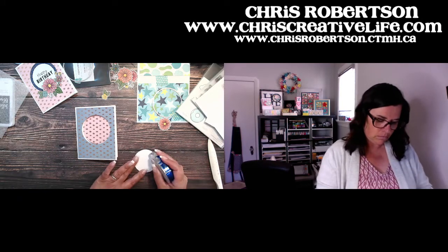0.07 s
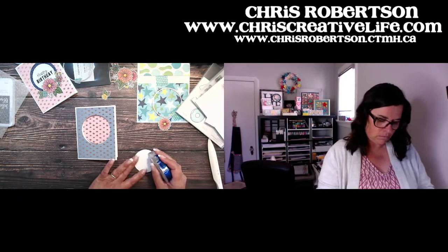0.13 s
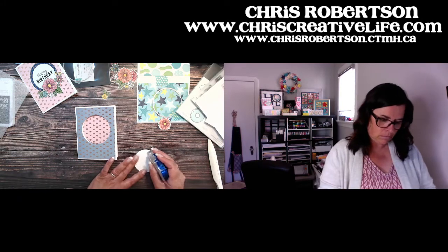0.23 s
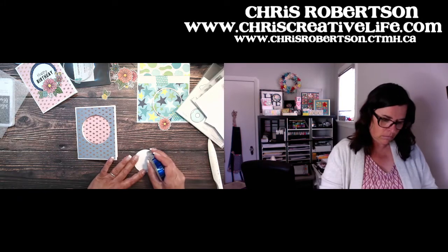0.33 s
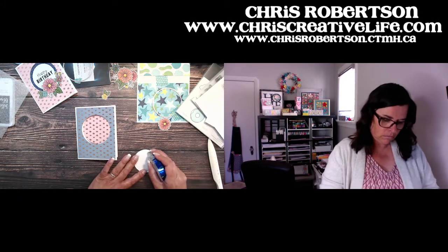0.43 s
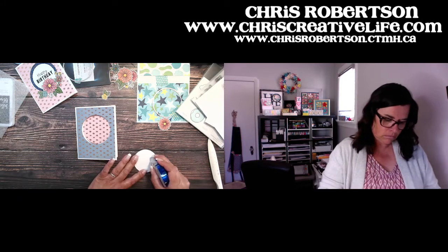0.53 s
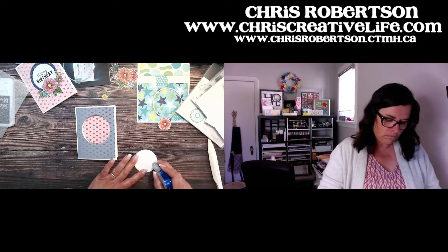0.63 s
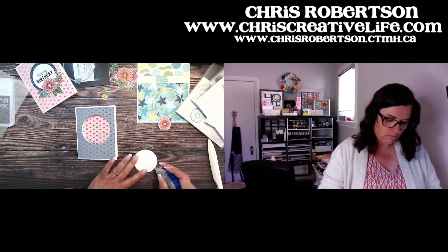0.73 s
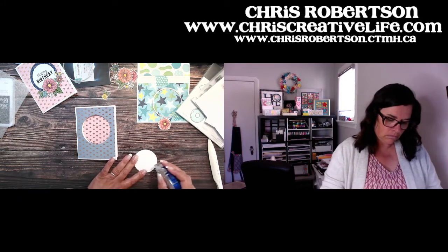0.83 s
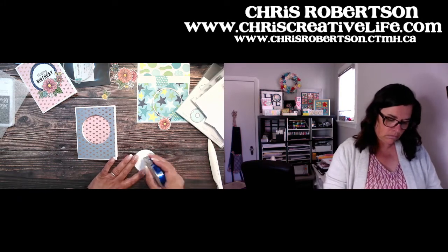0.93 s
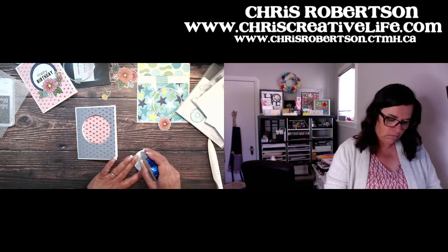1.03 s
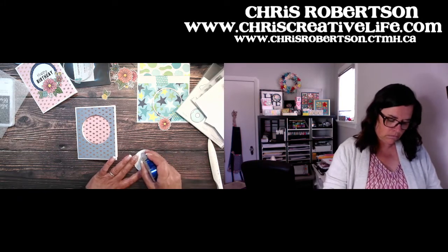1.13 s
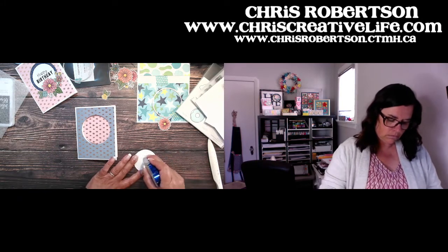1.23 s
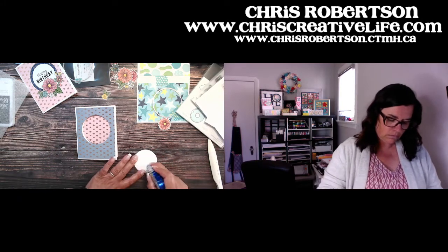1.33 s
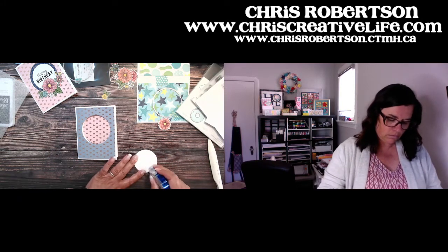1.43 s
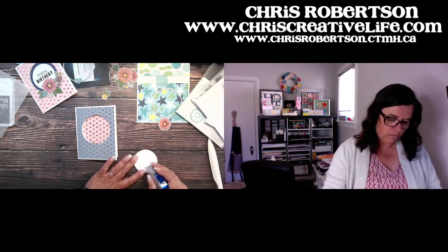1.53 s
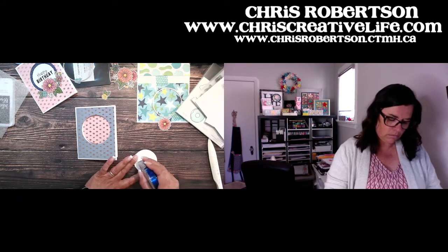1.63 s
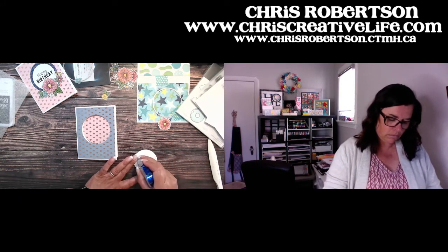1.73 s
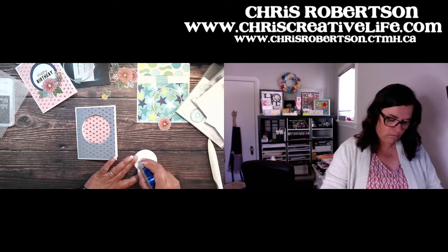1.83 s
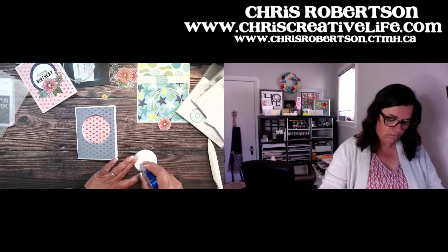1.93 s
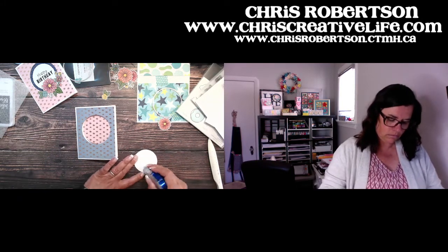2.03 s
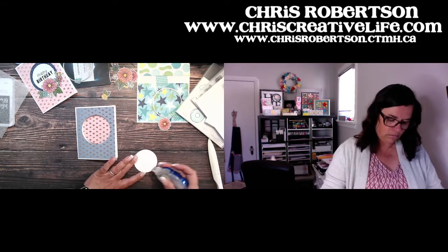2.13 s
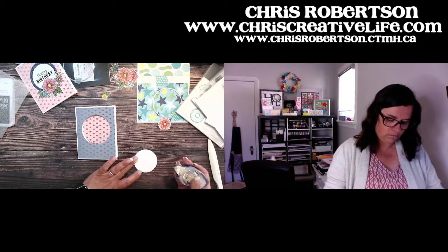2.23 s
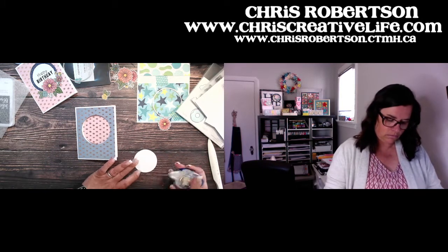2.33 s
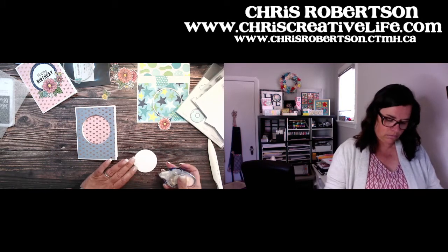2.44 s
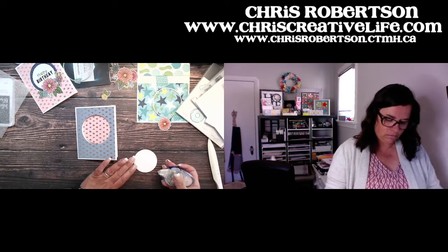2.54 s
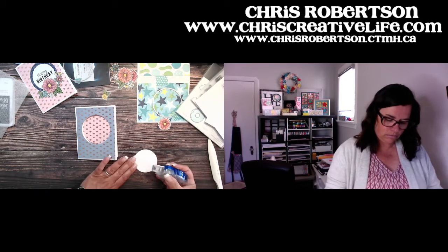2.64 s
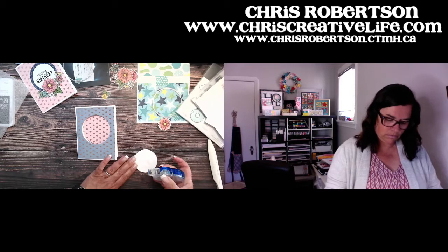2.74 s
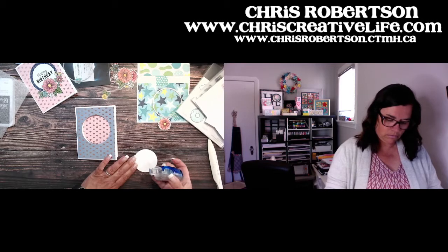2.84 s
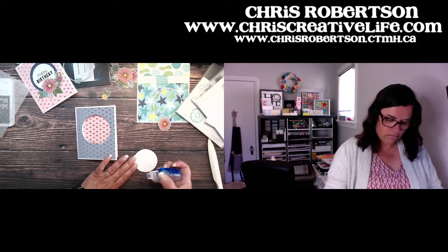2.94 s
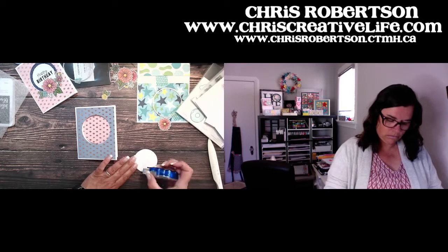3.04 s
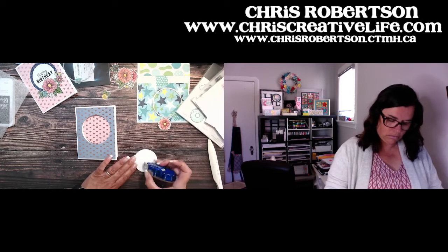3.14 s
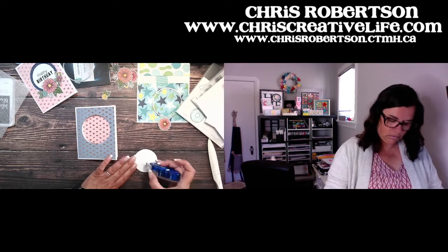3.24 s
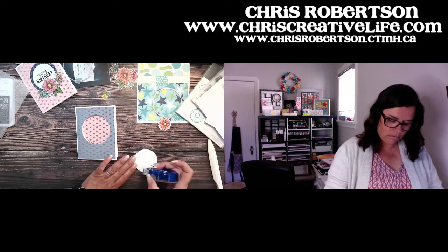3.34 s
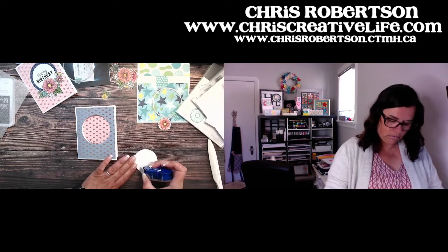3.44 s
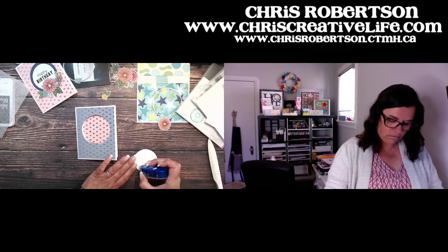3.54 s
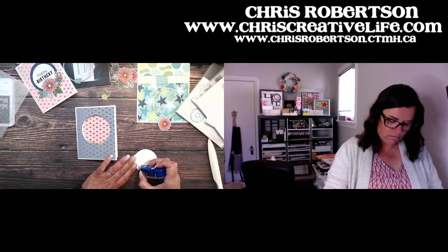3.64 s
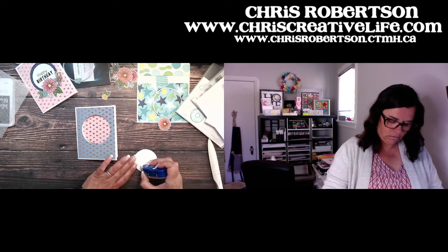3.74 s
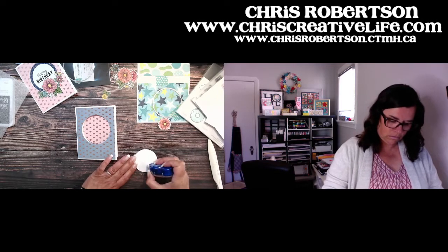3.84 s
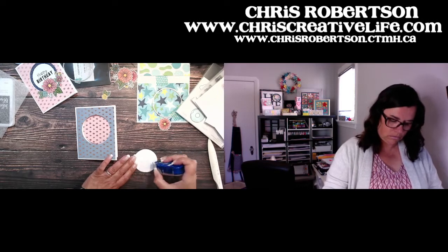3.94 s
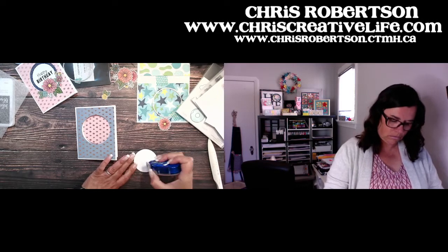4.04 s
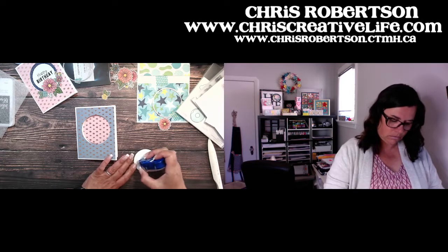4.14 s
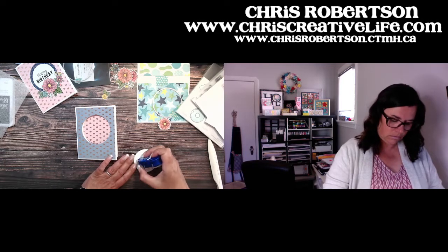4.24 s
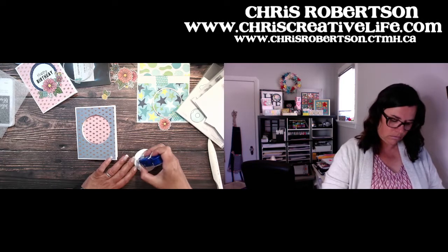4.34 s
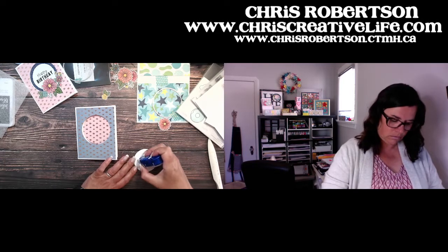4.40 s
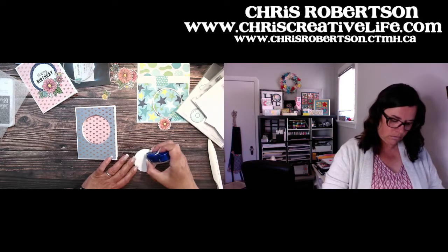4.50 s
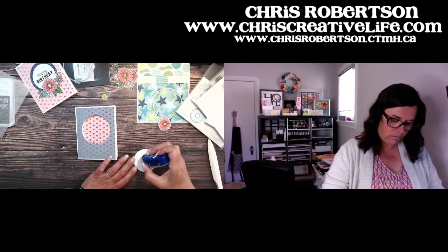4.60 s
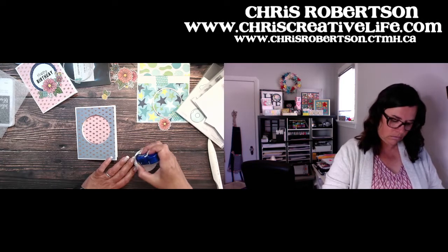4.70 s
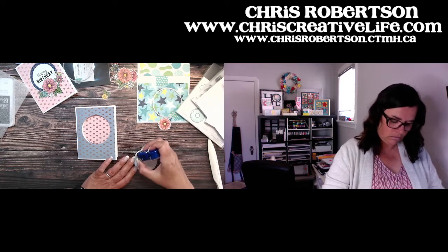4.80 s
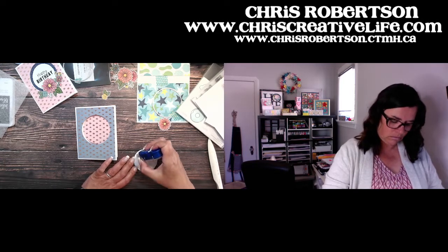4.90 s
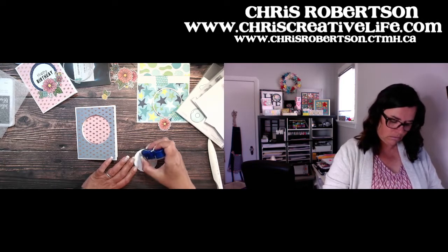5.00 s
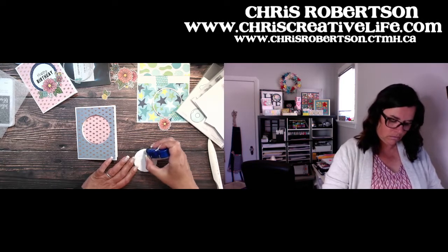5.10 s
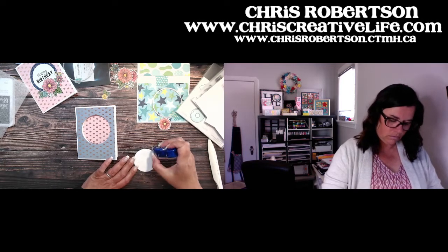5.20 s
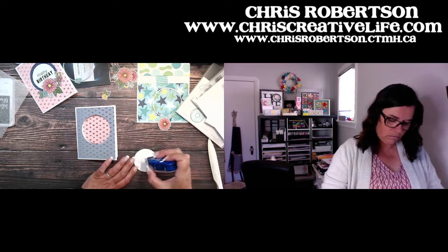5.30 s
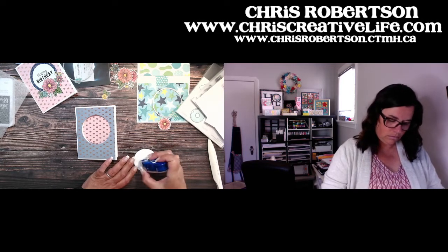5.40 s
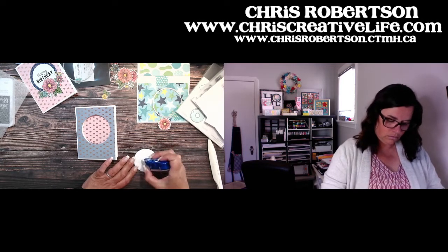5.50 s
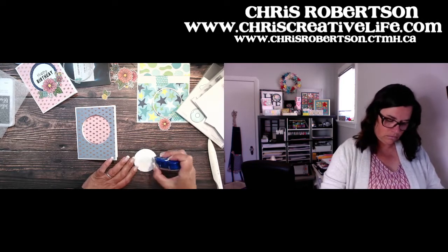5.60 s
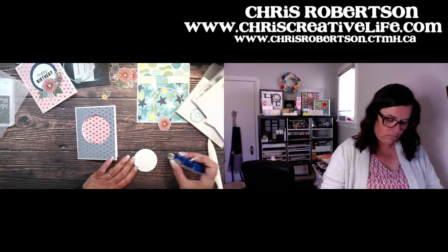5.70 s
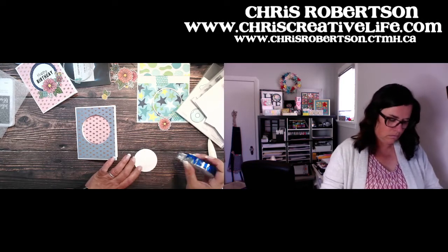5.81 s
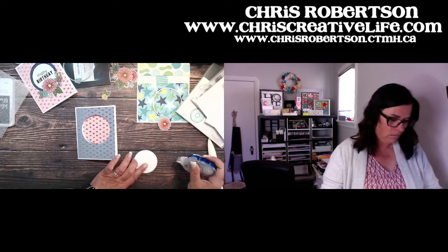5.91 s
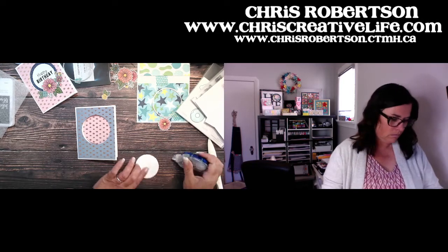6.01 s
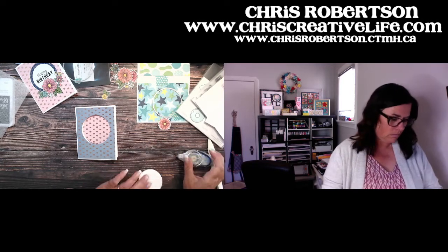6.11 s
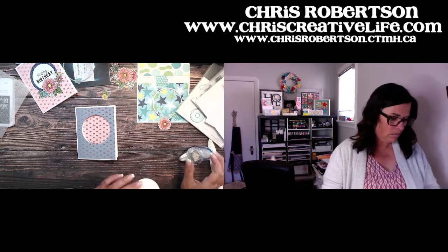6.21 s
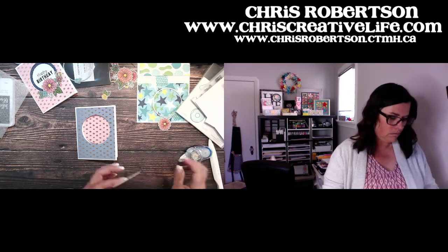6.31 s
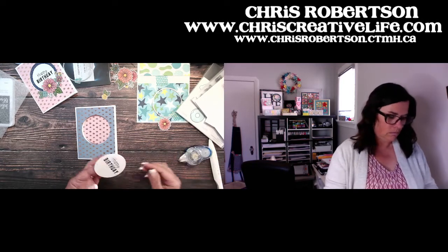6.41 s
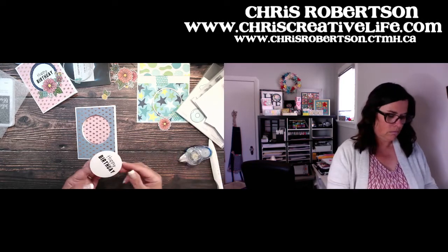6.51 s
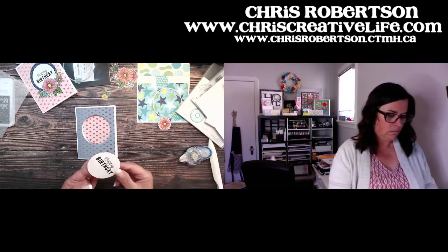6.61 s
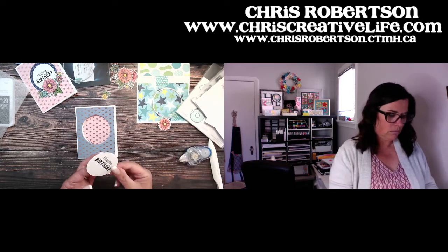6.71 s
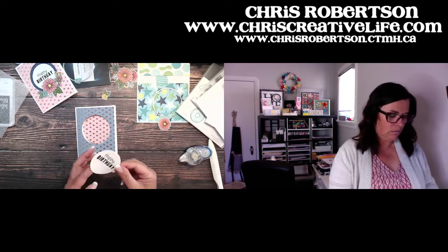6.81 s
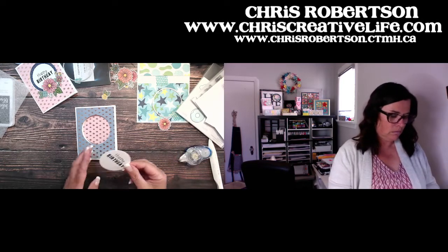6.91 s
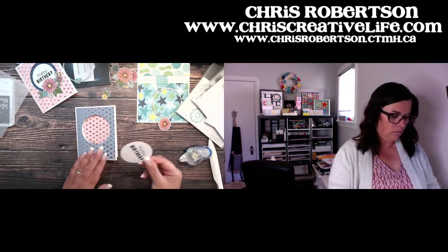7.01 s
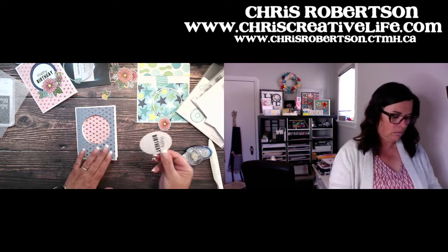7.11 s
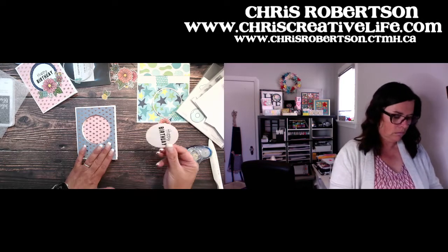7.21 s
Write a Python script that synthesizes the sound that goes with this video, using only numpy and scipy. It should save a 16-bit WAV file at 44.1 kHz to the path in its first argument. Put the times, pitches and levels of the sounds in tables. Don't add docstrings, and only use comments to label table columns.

```python
import sys
import numpy as np
from scipy import signal
from scipy.fft import rfft, irfft, next_fast_len
from scipy.io import wavfile
from scipy.ndimage import uniform_filter1d, map_coordinates

SR = 44100
rng = np.random.default_rng(int(sys.argv[2]) if len(sys.argv) > 2 else 0)


def ratio(d):
    e = np.asarray(d, float) / 20
    return 10 ** e


def master_out(mix):
    frames = np.transpose(np.atleast_2d(mix))
    ceiling = np.clip(frames, -1, 1)
    pcm = np.round(ceiling * 32767).astype(np.int16)
    wavfile.write(sys.argv[1], SR, pcm)


N = 319748

# pitch in Hz, level in dB per Hz.
HISS = [(50, -39), (85, -5), (161, -12.5), (201, -15), (381, -19.5), (507, -29), (690, -28), (788, -26.5),
        (879, -29.5), (1280, -32.5), (13800, -45.5), (16500, -49.5)]
MAINS_HZ = 60
# time in seconds, level in dB.
SWAY = [(0, -58.5), (.75, -28), (.91, -46), (1.11, -39.5), (1.47, -28.5), (1.86, -38), (2.06, -29),
        (2.95, -53), (3.76, -48), (3.84, -31.5), (4.26, -46.5), (4.68, -31.5), (4.81, -39), (5.37, -37),
        (5.53, -50.5), (5.67, -39.5), (7.25, -55)]
SHUDDER_DB, SHUDDER_GROWS, SHUDDER_REST_DB = -38, 0.33, -64
SHUDDER_RISE_S, SHUDDER_T60_S = 0.053, 0.39
HUM_DB = [1, 0.5, -1, -7.5, 2.5, 7, -3.5]

# pitch in Hz, width in Hz, level in dB.
CASE = [(3316, 545, -0.5), (4030, 1500, -3), (5230, 1320, -3), (6420, 830, -4), (7910, 1890, -4.5),
        (10190, 1900, -9), (11700, 1600, -11.5), (14400, 1400, -14)]
# pitch in Hz, width in Hz, level in dB.
HOLLOW = [(1110, 270, -3), (1400, 224, 2), (1599, 214, 1.5), (2150, 880, -7.5)]
# pitch in Hz, width in Hz, level in dB.
TABLE = [(408, 114, 2), (683, 220, -2), (802, 130, -2.5), (1011, 45, -7)]
# pitch in Hz, width in Hz, level in dB.
LEGS = [(139.8, 54, 0.5), (190, 135, 3), (281, 149, 2)]
# time in seconds, peak in dB, hollow part in dB, top part in dB.
TICKS = [(0.126, -52.5, -15, -10), (0.138, -48, -26, -13), (0.297, -45, -8.5, -5.5),
         (0.3148, -46, -5.5, -21), (0.3396, -38, -19, -17), (0.368, -35, -14.5, -5.5),
         (0.3888, -38.5, -20, -6.5), (0.847, -36.5, -10, -5.5), (0.8794, -58, -23, 3),
         (1.51, -41, -6.5, -11), (1.6084, -45.5, -16, 0), (1.9115, -37, -20, -7.5), (1.9353, -41, -14, -11),
         (1.948, -45, -17, -3.5), (2.191, -45, -22, -6), (4.91, -42, -21, -3), (4.817, -40, -25, -8),
         (2.1778, -42.5, -7, 3.5), (2.2197, -44, -22, -8.5), (2.231, -52, -5, -25), (3.614, -48, -4.5, -13),
         (3.652, -56, -15, -24), (3.67, -34.5, -15, -17), (4.228, -50, -8, -29), (4.3073, -31, -34, -15),
         (4.672, -50, -31, -3), (5.33, -42, -18, 3.5), (5.348, -50, -10, 1.5), (5.425, -61, -24, -4),
         (5.686, -36.5, -1.5, -25), (5.747, -46, -1, -19), (5.9739, -30.5, -24, -7), (6.129, -43, -21, -5),
         (6.135, -39, -25, -6), (6.334, -41.5, 4, -12)]
TICK_THUD_DB = -23.5

# time in seconds, ratchet teeth passed so far.
ROLLED = [
    [(.458, 0), (.4796, 1), (.5406, 5), (.5852, 9), (.684, 18), (.7235, 21), (.7556, 23), (.7952, 25)],
    [(1.113, 0), (1.2103, 3), (1.255, 6), (1.309, 12), (1.3921, 22), (1.4106, 24), (1.487, 30)],
    [(1.8066, 0), (1.8421, 1), (1.8992, 3), (1.9258, 4), (1.9567, 5), (1.9803, 6), (2.0158, 8),
     (2.1021, 16), (2.1495, 17)],
    [(3.683, 0), (3.7206, 1), (3.7792, 3), (3.8052, 4), (3.8249, 5), (3.8533, 8), (3.8965, 12),
     (3.9226, 14), (3.9458, 15)],
    [(4.287, 0), (4.387, 2), (4.4359, 4), (4.4804, 7), (4.5197, 11), (4.5427, 13), (4.5714, 14)],
    [(4.8458, 0), (4.9026, 1), (4.9373, 2), (4.9576, 3), (5.0187, 7), (5.0448, 9), (5.149, 17), (5.196, 23),
     (5.2459, 27)],
    [(5.5175, 0), (5.5571, 3), (5.6026, 7), (5.632, 10), (5.667, 14), (5.6945, 16)],
]
# time in seconds, level in dB.
EFFORT = [
    [(.3, -84.5), (.44, -60), (.5, -47.5), (.56, -45.5), (.7, -41.5), (.76, -47), (.82, -54), (.9, -85)],
    [(1.08, -52), (1.19, -57), (1.23, -44), (1.3, -42), (1.37, -41), (1.49, -50.5), (1.53, -55.5),
     (1.6, -57)],
    [(1.78, -55), (1.88, -56), (1.95, -49.5), (2.02, -42.5), (2.08, -44), (2.13, -57), (2.3, -59)],
    [(3.62, -67), (3.7, -55.5), (3.79, -52), (3.84, -42.5), (3.9, -42.5), (3.94, -57), (4.02, -57.5)],
    [(4.22, -58.5), (4.36, -53.5), (4.44, -62), (4.49, -37.5), (4.54, -40), (4.58, -56.5), (4.68, -58.5)],
    [(4.82, -45.5), (4.92, -93), (5.02, -47.5), (5.1, -44), (5.17, -39.5), (5.23, -39), (5.27, -62),
     (5.4, -57.5)],
    [(5.52, -49), (5.58, -45.5), (5.66, -35.5), (5.71, -51), (5.76, -54), (5.82, -58.5), (5.95, -59)],
]
# least level of the first teeth in dB, case drone in dB,
# pawl sings from in seconds, until in seconds, its ring in dB.
GRIP = [(-37, -26, 0.87, 0.42, -55), (-37.5, -11.5, 1.38, 1.3, -44), (-40, -33, 1.84, 1.5, -46.5),
        (-31.5, -7, 3.775, 3.84, -31.5), (-36.5, -6.5, 4.49, 4.53, -36), (-35.5, -7, 5.162, 5.185, -34),
        (-31.5, -5, 4.9, 6.6, -37.5)]
PRESS_DB = [3.5, 2.5, 2.5, -1, -2, 0.5, -3.5]
# time in seconds, change in dB.
CATCHES = [(.458, 10.5), (.4796, 7), (.495, 4), (1.113, 0.5), (1.145, 5.5), (1.178, 0.5), (1.21, 2.5),
           (1.8066, 4), (1.8421, 4), (1.871, 4), (1.8992, 8), (1.9258, 7.5), (1.9567, 4), (1.998, 1.5),
           (2.1495, 1), (3.683, -13), (3.7206, 1), (3.75, 2.5), (3.7792, 1.5), (3.8052, 3.5), (3.9226, -3),
           (3.9458, 4.5), (4.287, 8), (4.337, 4.5), (4.387, 0), (4.4135, 5), (4.4359, 5.5), (4.8458, 5),
           (4.9026, -2.5), (4.9373, 2.5), (4.9576, 4), (4.973, -2.5), (4.988, 5), (5.0187, -8),
           (5.0448, 5.5), (5.5175, 3), (5.544, -4)]
# time in seconds, peak in dB, brightness in dB.
SNAPS = [(0.5171, -36, -4), (0.5625, -34, -3), (0.5716, -33, -1), (0.5846, -35.0, 5), (0.595, -30, 2.5),
         (0.608, -34.5, 6), (0.662, -31.0, 4), (0.6732, -30.5, -1), (0.6963, -33, 4), (0.7101, -35, 4.0),
         (0.724, -31.5, 8), (0.7399, -33, 2), (0.7554, -32, 1), (0.774, -31, 0.0), (0.7953, -34.5, 3),
         (1.2296, -37.0, 6), (1.2442, -34, -3.0), (1.3337, -31.0, 2), (1.3428, -32, 0), (1.3512, -30, -2.0),
         (1.3602, -28.5, 5), (1.3676, -31.0, -4), (1.3756, -31, 5), (1.3838, -28, 2.5), (1.3918, -30, 0),
         (1.4106, -29.5, 2), (1.4246, -35, 2), (1.4723, -38.5, 6), (1.4867, -34.5, 0), (1.9802, -31.5, -2),
         (2.015, -41, -1), (2.0349, -34, 3), (2.0455, -34, -6.0), (2.057, -29.5, -3), (2.083, -39, 11),
         (3.8333, -30, 3), (3.8852, -28.5, 0.5), (3.8965, -33.5, 6), (3.912, -34, 3.5), (4.4509, -34.5, 3),
         (4.4668, -35.5, -3), (4.4791, -37, 4), (5.0028, -41.0, 1), (5.0841, -31.5, 2), (5.099, -40, 0),
         (5.107, -37.0, 3), (5.1211, -38, 0), (5.136, -36, -4), (5.149, -31.5, -6), (5.1589, -30, 0.0),
         (5.1743, -30.5, -6), (5.181, -29.0, 3), (5.556, -34, 4.5), (5.5649, -36.0, 2.5),
         (5.5707, -32.5, 4), (5.582, -32.5, 2), (5.5919, -30.5, 2.0), (5.6023, -28, -1), (5.654, -36, -3),
         (5.6677, -27, -2)]
SNAP_DB, BLURRED_DB = 2.5, -1
TOOTH_DB, TOOTH_GROWS = -30, 0.74
TOOTH_SCATTER_DB, TOOTH_JITTER_S, TOOTH_LEAD_S = 2.2, .0012, .001
BREAK_DB = -3
REBOUND_S, REBOUND_DB, SLOW_S = .0095, -6, .021
# pitch in Hz, width in Hz, level in dB.
PAWL = [(3300, 480, 0)]
PAWL_RISE_DB_S, PAWL_FALL_DB_S = 208, 402
# pitch in Hz, level in dB per Hz.
CRACKLE = [(1290, -40.5), (2200, -8), (2740, -15), (3350, -16), (3650, -13), (6310, -10.5), (7350, -13.5),
           (8340, -9), (9300, -12), (11500, -22), (15000, -26), (16000, -31), (16500, -44)]
DRONE_LAGS, RUB_DB, RUB_LAGS = 0.38, -16, 0.27
# start in seconds, length in seconds, level in dB, case drone in dB.
SLIDES = [
    (2.34, 0.18, -56, -12),
    (2.929, 0.06, -57, -4),
    (6.008, 0.16, -51.5, -6),
    (6.775, 0.196, -56, -6.5),
    (6.867, 0.017, -42.5, -7.5),
]
SLIDE_RISE_DB_S, SLIDE_FALL_DB_S = 1197.5, 601
# time in seconds, level in dB.
THUMB = [(0, -21), (.5, 0), (.6, 4), (.8, 0.5), (1.2, 0), (1.42, 3), (1.5, -1), (1.9, -3), (2.1, 4.5),
         (3.7, 1), (3.9, 0.5), (4.4, 1.5), (4.52, -1), (5.05, -2), (5.18, 0), (5.6, -3.5), (5.72, 0),
         (7.25, 0.5)]
# pitch in Hz, width in Hz, level in dB.
TILTED = [(1166, 374, -2), (1418, 170, 3), (1600, 180, 1.5), (2346, 257, -1)]
TURN_S = 3
GRIP_WANDERS_DB, HOLLOW_WANDERS_DB, PATCHY_DB = 1.5, 2.5, 2
TOP_HZ, TOP_LIFT_DB = 11000, 2.5

# time in seconds, pitch in Hz, level in dB,
# time to fall 60 dB in seconds.
PINGS = [(.369, 3400, -49, .05), (1.113, 3800, -35.5, 0.024), (1.179, 3640, -37, 0.023),
         (1.741, 1510, -35.5, 0.09), (2.566, 5100, -45, .015), (2.691, 1300, -47, .07),
         (3.193, 3320, -33, 0.013), (3.684, 6300, -33, 0.024), (4.338, 6300, -33, 0.024),
         (6.043, 550, -35.5, 0.06), (4.362, 740, -42, 0.014), (2.8165, 10700, -38, .015),
         (2.692, 9800, -27.5, 0.017), (6.7115, 3250, -58, 0.012), (4.912, 10500, -36, 0.017),
         (2.566, 5700, -38, .05), (5.23, 753, -46, 0.026), (5.517, 3480, -44, 0.045),
         (6.144, 2230, -18, 0.033), (6.144, 3100, -26, .03), (6.223, 1700, -35, 0.23),
         (6.222, 3870, -34, 0.24), (6.223, 7300, -29, 0.15), (6.223, 11330, -38, 0.13),
         (6.336, 1770, -45, .02)]

# time in seconds, peak in dB, hollow part in dB, thud part in dB, weight in dB.
BLOWS = [
    (1.0661, -29, -14, -16.5, -34.5),
    (1.738, -21, -11.5, -18.5, -32.5),
    (3.6808, -28.5, -17, -35, -46),
    (4.2343, -41.5, -9.5, -9, -40),
    (4.773, -21, -12.5, -21.5, -35),
    (5.4803, -17.5, -16, -20.5, -33.5),
    (6.0416, -24.5, -8.5, -9, -31.5),
    (6.118, -38.5, 3.5, 1, -50),
    (6.143, -5, -11, -20.5, -31),
    (6.2219, -2, -14, -25.5, -34.5),
]
LET_GO_S, FALLS_FLAT_S = 6.1, 6.2
BLOW_TOP_DB = -12
# pitch in Hz, width in Hz, level in dB.
LANDS = [(3170, 250, 1.5), (3600, 240, 2.5), (4566, 520, -4), (5870, 1300, -7)]
# pitch in Hz, width in Hz, level in dB.
LANDS_AIR = [(720, 280, -1), (1310, 310, -0.5), (1660, 200, -1.5), (2130, 200, 1.5)]
# pitch in Hz, width in Hz, level in dB.
DROPPED = [(2635, 450, -11), (3400, 290, -0.5), (3496, 310, -2), (3870, 160, 3), (4610, 400, -6.5),
           (5240, 480, -5), (5950, 430, -4.5), (7600, 540, -7)]
# pitch in Hz, width in Hz, level in dB.
FLAT = [(560, 130, -4.5), (1380, 220, 0.5), (1680, 180, 0.5), (2160, 410, -5)]
# pitch in Hz, level in dB, time to fall 60 dB in seconds.
STAND = [(163, -34, 1.1), (209.6, -26.5, 0.67), (261, -11, 0.21), (313, -25.5, 0.53), (366.3, -5, 0.38),
         (363, -35.5, 0.51), (414, -26, 0.5)]
# pitch in Hz, level under the blow in dB, time to fall 60 dB in seconds.
SPRING = [(1280, -57, 0.48), (2780, -63, 1.2), (3850, -45.5, 0.45)]
RING_DB, RING_GROWS = -40.5, 1.7

# time in seconds, peak in dB, hollow part in dB, top part in dB.
CREAKS = [(2.545, -43.5, -2.5, -7), (2.559, -39, -4, -3), (2.5641, -29, -31, -7.5), (2.6825, -28, -14, -11),
          (2.691, -16, -10.5, -4.5), (2.8153, -37.5, -12, -1.5), (2.927, -51, -10, -6),
          (2.948, -49.5, -4.5, -20), (2.978, -43, -4, -13), (3.061, -53.5, -9, -23),
          (3.1921, -30, -20, -4.5), (3.283, -45.5, -9.5, -13)]
CREAK_THUD_DB = -49
# pitch in Hz, width in Hz, level in dB.
OPEN_CASE = [(3430, 980, -4), (5570, 1400, -2.5), (6800, 1200, -2)]
# pitch in Hz, width in Hz, level in dB.
LOOSE_HOLLOW = [(1280, 296, -2), (1597, 216, 3.5), (1810, 234, -3), (2160, 180, -3)]

# time in seconds, peak in dB, hollow part in dB, top part in dB.
FLICKS = [(6.654, -53, -13.5, -18), (6.7101, -42.5, -25, -14.5), (6.769, -26, -28, -8),
          (6.864, -31.5, -22.5, -23), (6.8768, -27.5, -19.5, -22), (6.8796, -27, -21.5, -21.5),
          (6.887, -42, -14.5, -22), (6.894, -38.5, -12, -22), (6.906, -42, -12, -22)]
# pitch in Hz, width in Hz, level in dB.
SHEET = [(3060, 750, -1), (5200, 810, -4.5), (6920, 970, -4), (7860, 900, -9.5)]
# time in seconds, pitch in Hz, level in dB, time to fall 60 dB in seconds.
CARD = [(6.722, 747, -50, 0.11)]

# pitch in Hz, time to fall 60 dB in seconds.
ROOM = [(200, 0.28), (1500, 0.25), (4000, 0.2), (8000, 0.22), (12000, 0.16), (15500, 0.098)]
LATE_DB, LATE_T60_S = -25, 0.73
# pitch in Hz, level in dB.
WALLS = [(300, -5.5), (1600, -2), (4000, -3), (8000, -8.5), (12000, -8), (15500, -7)]
SCATTER_HZ = 2400


def unit(x):
    return x / np.sqrt(np.mean(x ** 2) + 1e-20)


def along(points, hz):
    f, v = np.transpose(points)
    return np.interp(np.log(hz + 1), np.log(f + 1), v)


def curves(tables):
    out = np.full((len(tables[0][0]) - 1, N), -120.)
    for rows in tables:
        s, *cols = np.transpose(rows)
        i = np.arange(round(s[0] * SR), min(N, round(s[-1] * SR)))
        out[:, i] = [np.interp(i / SR, s, c) for c in cols]
    return out


def per_stroke(values):
    return np.interp(np.arange(N) / SR, [rows[3][0] for rows in EFFORT], values)


def swell(t, start, end, db, rise_db_s, fall_db_s):
    return db - rise_db_s * np.maximum(start - t, 0) - fall_db_s * np.maximum(t - end, 0)


def wobble(rate):
    knots = rng.standard_normal(int(N * rate / SR) + 4)
    return map_coordinates(knots, [np.arange(N) * rate / SR])


def filtered(x, response):
    m = next_fast_len(N + SR // 2)
    return irfft(rfft(x, m) * response(np.fft.rfftfreq(m, 1 / SR)), m)[..., :N]


def modes(table):
    def response(f):
        return sum((-1) ** k * ratio(db) * 1j * f * w / (c * c - f * f + 1j * f * w)
                   for k, (c, w, db) in enumerate(table))
    return response


def bursts(s, db, rise, t60, even):
    t = np.arange(1024) / SR
    shape = (1 - np.exp(-t / rise)) * ratio(-30 * t / t60)
    z = rfft(shape * rng.standard_normal((len(s), len(t))))
    puffs = shape * irfft(z / np.abs(z) ** even)
    puffs *= ratio(db)[:, None] / np.linalg.norm(puffs, axis=1, keepdims=True)
    at = np.round(s * SR).astype(int)[:, None] + np.arange(len(t))
    return np.bincount(at.ravel(), puffs.ravel(), N + SR)[:N]


def unsteady(hz, width_hz):
    noise = filtered(rng.standard_normal(N), lambda f: modes([(hz, width_hz, 0)])(f) ** 2)
    narrow = signal.hilbert(noise, next_fast_len(N))[:N]
    return np.sqrt(2) * np.real(narrow / (np.abs(narrow) + 0.24 * np.std(narrow)))


def background():
    hum = ratio(-46.5) * np.sin(2 * np.pi * MAINS_HZ * np.arange(N) / SR)
    rumble = filtered(rng.standard_normal(N), lambda hz: modes([(28, 25, -3), (62, 30, -9)])(hz) ** 2)
    hiss = filtered(rng.standard_normal(N), lambda hz: ratio(along(HISS, hz)))
    return hum + ratio(-56.0) * unit(rumble) + ratio(-61.5) * unit(hiss)


def stand(drawn):
    sway_db, = uniform_filter1d(curves([SWAY]), size=2000)
    shudder = ratio(SHUDDER_REST_DB)
    for s, *_, weight_db in BLOWS:
        t = np.maximum(np.arange(N) / SR - s, 0)
        db = SHUDDER_DB + SHUDDER_GROWS * (weight_db + 33.5) - 60 * t / SHUDDER_T60_S
        shudder = shudder + ratio(db) * (1 - np.exp(-t / SHUDDER_RISE_S))
    out = ratio(sway_db) * unsteady(15, 2.8)
    out += shudder * (unsteady(32, 13) + ratio(-4.5) * unsteady(72, 8.7))
    push = np.sqrt(np.abs(uniform_filter1d(drawn ** 2, size=3000)))
    hum_db = -21 + per_stroke(HUM_DB) + 2.5 * wobble(6)
    return out + ratio(hum_db) * push * unsteady(366, 4.1)


def contacts(s, db, hollow_db, top_db, thud_db, t60, air=HOLLOW, body=CASE[:4]):
    shell = bursts(s, db + 23.0, rise=0.0037, t60=t60, even=0.25)
    edges = bursts(s, db + top_db + 29.5, rise=0.00066, t60=1.6 * t60, even=0.72)
    hollow = bursts(s, db + hollow_db + 35.5, rise=0.00054, t60=0.95 * t60, even=0.44)
    thud = bursts(s, db + thud_db + 41.5, rise=0.0029, t60=0.75 * t60, even=0.67)
    out = filtered(shell, modes(body)) + filtered(hollow, modes(air)) + filtered(thud, modes(TABLE))
    return out + filtered(edges, lambda hz: modes(CASE[4:-1])(hz) * modes([(10500, 15000, 1)])(hz))


def ticks():
    return contacts(*np.transpose(TICKS), TICK_THUD_DB, t60=0.012)


def rubbing():
    rows = [[(s, db, grip[1]) for s, db in effort] for effort, grip in zip(EFFORT, GRIP)]
    effort_db, grip_db = curves(rows)
    t = np.arange(N) / SR
    slides_db = np.array([swell(t, s, s + hold, db, SLIDE_RISE_DB_S, SLIDE_FALL_DB_S)
                          for s, hold, db, _ in SLIDES])
    db = np.maximum(effort_db, slides_db.max(axis=0))
    slide_drone_db = np.transpose(SLIDES)[-1][slides_db.argmax(axis=0)]
    drone_db = np.where(effort_db == db, np.maximum(grip_db, -40), slide_drone_db)
    drone_db = drone_db - DRONE_LAGS * (np.maximum(db, -62) + 44.0)
    return db, drone_db, RUB_DB - RUB_LAGS * (db + 40.5)


def teeth(effort_db):
    rows = []
    for rolled, effort, (first_db, _, sings, stops, ring_db) in zip(ROLLED, EFFORT, GRIP):
        at, passed = np.transpose(rolled)
        s = np.interp(np.arange(passed[-1] + 1), passed, at) - TOOTH_LEAD_S
        slow = np.gradient(s) > SLOW_S
        s += TOOTH_JITTER_S * rng.standard_normal(len(s)) * ~slow
        db = TOOTH_DB + TOOTH_GROWS * (effort_db[(s * SR).astype(int)] + 44.0)
        building = s < max(effort, key=lambda row: row[1])[0]
        db = np.where(building, np.maximum(db, first_db), db)
        db += TOOTH_SCATTER_DB * rng.standard_normal(len(s)) * ~slow
        db[0] += BREAK_DB
        s, db = np.r_[s, s[slow] + REBOUND_S], np.r_[db, db[slow] + REBOUND_DB]
        rows.append([s, db, swell(s, sings, stops, ring_db, PAWL_RISE_DB_S, PAWL_FALL_DB_S)])
    rows = np.concatenate(rows, axis=1)
    for s, db in CATCHES:
        rows[1, np.abs(rows[0] + TOOTH_LEAD_S - s).argmin()] += db
    return rows[:, np.argsort(rows[0])]


def marked(s, db):
    at, peak_db, bright_db = np.transpose(SNAPS)
    i = np.abs(s[:, None] + TOOTH_LEAD_S - at).argmin(axis=0)
    db = db + BLURRED_DB * (np.gradient(s) < .014)
    s, tilt_db = s.copy(), np.zeros(len(s))
    s[i], db[i], tilt_db[i] = at - TOOTH_LEAD_S, peak_db + SNAP_DB, bright_db
    return s, db, tilt_db


def adhesive_grains():
    snaps = ratio(0.96 * rng.exponential(size=N)) * (rng.random(N) < .02)
    clumps = uniform_filter1d(snaps, size=50)
    return (unit(clumps) + 1.2) * rng.standard_normal((3, N))


def case_shell(s, db, tilt_db, crackle):
    clicks = bursts(s, db + 16, rise=0.00062, t60=0.016, even=0.26)
    out = filtered(clicks, lambda hz: modes(CASE)(hz) * modes([(7000, 14000, 0)])(hz))
    for mode in CASE:
        mode_hz, width_hz, mode_db = mode
        strike_db = db + 18 + tilt_db * np.sign(mode_hz - 6000) + 3 * rng.standard_normal(len(s))
        snaps = bursts(s, strike_db, rise=.0013, t60=.017, even=.3)
        push = ratio(GRIP_WANDERS_DB * wobble(24)) * (snaps + ratio(4.5 - mode_db) * crackle)
        out += filtered(push, lambda hz: modes([mode])(hz) * modes([(mode_hz, 2.5 * width_hz, 0)])(hz))
    return out


def case_hollow(s, db, drone):
    inside = bursts(s, db + 16.5, rise=0.0016, t60=0.036, even=0.09) + drone
    inside *= ratio(curves([THUMB])[0] + HOLLOW_WANDERS_DB * wobble(20))
    turned = np.arange(N) > TURN_S * SR
    both = np.array([inside * ~turned, inside * turned])
    return filtered(both, lambda hz: np.array([modes(HOLLOW)(hz), modes(TILTED)(hz)]) ** 2).sum(axis=0)


def pawl(s, ring_db):
    plucks = bursts(s, ring_db + 2.7 * rng.standard_normal(len(s)), rise=0.0005, t60=0.021, even=0.39)
    return ratio(32.5) * filtered(plucks, lambda hz: modes(PAWL)(hz) ** 2)


def strokes():
    crackle_db, drone_db, rub_db = rubbing()
    s, db, ring_db = teeth(crackle_db)
    gap = np.diff(s, prepend=0)
    db = db - 3 * np.clip(1.6 - gap / .012, 0, 1)
    s, db, tilt_db = marked(s, db)
    faint_db = 1.16 * np.maximum(-48.0 - crackle_db, 0)
    level = uniform_filter1d(ratio(crackle_db - 5.0 - faint_db), size=400)
    grains = adhesive_grains()
    crackle = level * unit(filtered(grains[0], lambda hz: ratio(along(CRACKLE, hz))))
    drone = level * ratio(drone_db + 10.0) * grains[1]
    rub = level * ratio(rub_db + per_stroke(PRESS_DB)) * unit(filtered(grains[2], modes(LEGS + TABLE)))
    out = ratio(-3.5) * crackle + case_shell(s, db, tilt_db, crackle)
    return out + case_hollow(s, db, drone) + pawl(s, ring_db) + rub


def brightened(x):
    top = filtered(x, lambda hz: 1 / (1 + (TOP_HZ / (hz + 1)) ** 10))
    return x + top * (ratio(TOP_LIFT_DB) - 1)


def patchy(x):
    hz, t, z = signal.stft(x, SR, nperseg=256)
    field = uniform_filter1d(rng.standard_normal(z.shape), size=4, axis=0)
    field = unit(uniform_filter1d(field, size=4, axis=1))
    gain_db = PATCHY_DB * field * (hz > SCATTER_HZ)[:, None] - 0.5
    return signal.istft(z * ratio(gain_db), nperseg=256)[1][:N]


def pings():
    out, t = np.zeros(N), np.arange(SR // 4) / SR
    chance = rng.standard_normal((len(PINGS), 2, 3, 1))
    for (s, hz, db, t60), (detune, turn) in zip(PINGS, chance):
        tones = np.sin(2 * np.pi * (hz * (1 + .025 * detune) * t + turn)).sum(axis=0) / np.sqrt(3)
        out[round(s * SR):][:len(t)] += ratio(db - 60 * t / t60) * (1 - np.exp(-t / 0.0007)) * tones
    return out


def blows():
    s, db, hollow_db, thud_db, _ = np.transpose(BLOWS)
    held, flat = s < LET_GO_S, s > FALLS_FLAT_S
    tip = (s > LET_GO_S) & (s < FALLS_FLAT_S)
    out = contacts(s[held], db[held], hollow_db[held], BLOW_TOP_DB, thud_db[held], t60=0.019)
    out += contacts(s[tip], db[tip], hollow_db[tip], BLOW_TOP_DB - 3.5, thud_db[tip], t60=.012,
                    air=LANDS_AIR, body=LANDS)
    return out + contacts(s[flat], db[flat], hollow_db[flat], BLOW_TOP_DB - 5.0, thud_db[flat], t60=0.0088,
                          air=FLAT, body=DROPPED)


def thumps():
    push, t = np.zeros(N), np.arange(400) / SR
    shape = t * np.exp(-t / 0.0004)
    for s, *_, weight_db in BLOWS:
        push[round(s * SR):][:len(t)] += ratio(weight_db + 47.0) * shape / shape.sum()
    return filtered(push, modes(LEGS))


def ring():
    out, t = np.zeros(N + SR), np.arange(SR) / SR

    def tones(table, start):
        return sum(ratio(db + rng.normal(0, 1) - 60 * t / t60) * np.sin(2 * np.pi * hz * (start + t))
                   for hz, db, t60 in table)

    for start, db, *_, weight_db in BLOWS:
        ring_db = RING_DB + RING_GROWS * (weight_db + 36.5) + 14.0
        late = ratio(ring_db) * (1 - np.exp(-t / 0.032)) ** 2 * tones(STAND, start)
        out[round(start * SR):][:SR] += late + ratio(db) * tones(SPRING, start)
    return out[:N]


def creaks():
    return contacts(*np.transpose(CREAKS), CREAK_THUD_DB, t60=0.01, air=LOOSE_HOLLOW, body=OPEN_CASE)


def flicks():
    return contacts(*np.transpose(FLICKS), TICK_THUD_DB, t60=0.0096, body=SHEET)


def card():
    out = np.zeros(N)
    for s, hz, db, t60 in CARD:
        t = np.maximum(np.arange(N) / SR - s, 0)
        out += ratio(db - 60 * t / t60) * (1 - np.exp(-t / 0.01)) * np.sin(2 * np.pi * hz * t)
    return out


def dying_away(hz, t):
    return ratio(-60 * t / along(ROOM, hz)[:, None]) + ratio(LATE_DB - 60 * t / LATE_T60_S)


def scattered(x):
    hz, t, z = signal.stft(x, SR, nperseg=256)
    dying = dying_away(hz, t[:160]) ** 2
    power = uniform_filter1d(np.abs(z) ** 2, size=3, axis=0)
    power = signal.fftconvolve(power, dying / dying.sum(axis=1).mean(), axes=1)[:, :z.shape[1]]
    fresh = signal.stft(rng.standard_normal(N), nperseg=256)[2]
    hiss = signal.istft(fresh / np.std(fresh) * np.sqrt(np.abs(power)), nperseg=256)[1]
    return np.pad(hiss, (220, 0))[:N]


def room(x):
    wet, step = np.zeros(N + 2 * SR), SR // 3
    for i in range(0, N, step):
        hz, t, z = signal.stft(rng.standard_normal(SR // 2), SR, nperseg=256)
        tail = signal.istft(z * dying_away(hz, t), SR, nperseg=256)[1]
        echo = signal.fftconvolve(x[i:i + step], tail / np.linalg.norm(tail))
        wet[i + 220:][:len(echo)] += echo

    def shares(hz):
        low = 1 / (1 + (hz / SCATTER_HZ) ** 8)
        return np.sqrt([.25 + 0.8 * low, 0.79 * (1 - low)])

    late = filtered(np.array([wet[:N], scattered(x)]), shares).sum(axis=0)
    near_wall = np.pad(x, (round(0.0052 * SR), 0))[:N]
    return ratio(-3.0) * late + ratio(-10.0) * near_wall


def scene():
    drawn = patchy(brightened(strokes()))
    hits = ticks() + pings() + blows() + creaks() + flicks()
    low = thumps()
    answer = room(ratio(-0.5) * drawn + hits + ratio(1.0) * low)
    answer = filtered(answer, lambda hz: ratio(along(WALLS, hz)))
    return (drawn + hits + answer + ring() + low + card() + stand(drawn) + background())[None]


def top_cut(x):
    return signal.sosfilt(signal.butter(12, 16680, fs=SR, output="sos"), x)


def record(dry):
    limited = filtered(dry, lambda hz: np.where(hz < 15900, 1, ratio(-30.0)))
    return top_cut(limited - .0007)


dry = scene()
out = record(dry)
master_out(out)
```